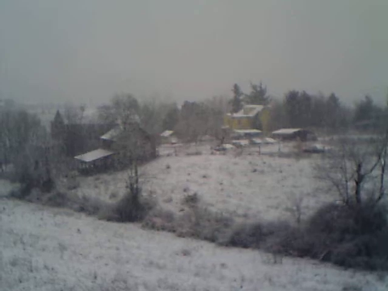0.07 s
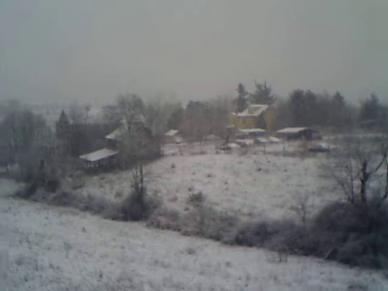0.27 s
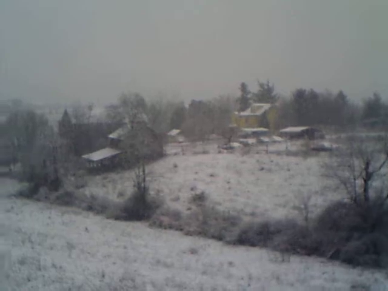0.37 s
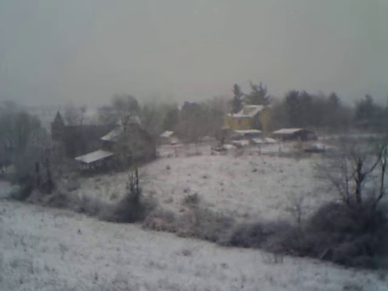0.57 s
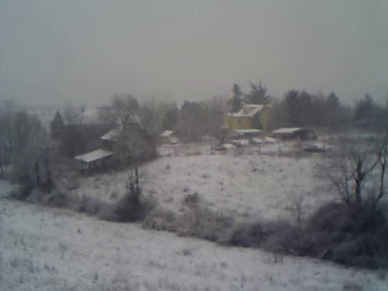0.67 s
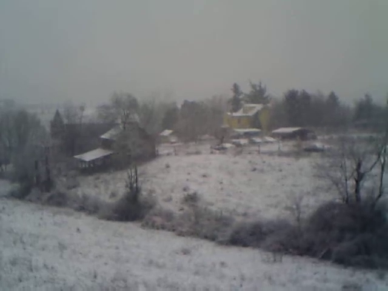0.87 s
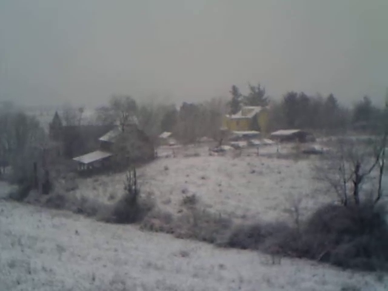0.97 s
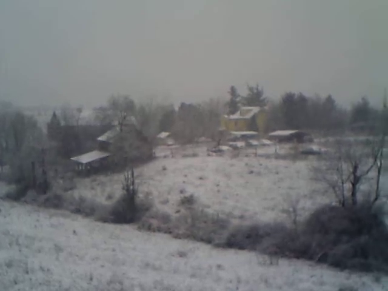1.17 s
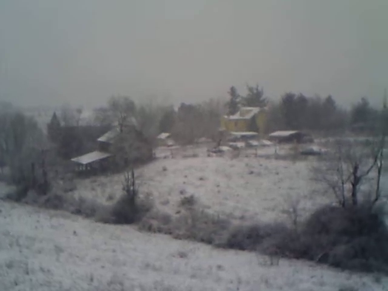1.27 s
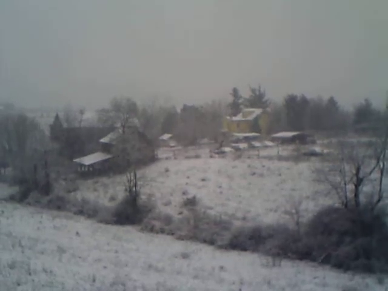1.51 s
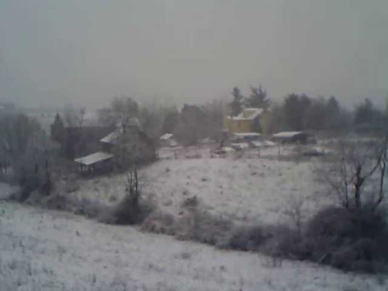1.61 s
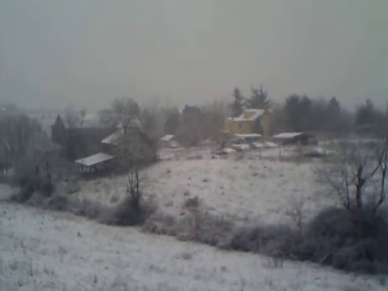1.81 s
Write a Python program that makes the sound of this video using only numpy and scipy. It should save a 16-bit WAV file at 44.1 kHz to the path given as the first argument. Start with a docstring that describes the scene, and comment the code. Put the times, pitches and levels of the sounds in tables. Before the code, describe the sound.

Light wind rumbles on the microphone in an open field, fading in as two loud, crackly electrical thumps hit close up. The wind and a distant wash then grow slightly, with faint hiss and tiny camera ticks.

```python
"""Camera starting up in a snowy field

The microphone input settles with a few electrical thumps: its voltage jumps, sags and
snaps back, twice hard enough to overload. Light wind on the microphone and a distant wash
fade up, while the camera adds faint hiss, a thin whine, fine clicks and lens motor ticks."""
import sys
import numpy as np
from scipy import signal
from scipy.fft import rfft, irfft
from scipy.io import wavfile
from scipy.ndimage import uniform_filter1d

SR = 44100
rng = np.random.default_rng(int(sys.argv[2]) if len(sys.argv) > 2 else 0)


def generate_wav(signal):
    """Clip the signal to [-1, 1] and save it as 16-bit WAV at the path in sys.argv[1]."""
    frames = np.transpose(np.atleast_2d(signal))
    scaled = np.clip(frames, -1, 1) * 32767
    pcm = np.round(scaled).astype(np.int16)
    wavfile.write(sys.argv[1], SR, pcm)


N = 81585
T = np.arange(N) / SR


def amp(db):
    """Decibels to gain."""
    return 10 ** (np.asarray(db) / 20)


def unit(x):
    """Scales to rms 1."""
    return x / np.sqrt(np.mean(x ** 2) + 1e-20)


def curve(points):
    """Automation: straight lines between (time, value) points."""
    return np.interp(T, *np.transpose(points))


def noise(spectrum, patchy_db=0):
    """Coloured noise at rms 1, with optional patches drifting in time and frequency."""
    hz, db = np.transpose(spectrum)
    bands = signal.stft(rng.standard_normal(N), nperseg=512)[2]
    patches = uniform_filter1d(rng.standard_normal(bands.shape), size=9, axis=0)
    patches = uniform_filter1d(patches, size=10, axis=1)
    white = signal.istft(bands * amp(patchy_db * unit(patches)), nperseg=512)[1][:N]
    log_hz = np.log(np.fft.rfftfreq(N, 1 / SR) + 1)
    colour = amp(np.interp(log_hz, np.log(hz), db))
    return unit(irfft(rfft(white) * colour, N))


def low_pass(x, hz, taps):
    """Steep linear-phase low-pass."""
    return signal.fftconvolve(x, signal.firwin(taps, hz, window=("kaiser", 8), fs=SR), "same")


# Dark tone of the crackle (frequency [Hz], level [dB])
CRACKLE_EQ = [(30, 0), (150, 4), (400, -7.5), (1200, -17), (3500, -32), (9000, -30.5), (12000, -37)]
# Thump cues (time [s], length [s], height [share of full scale], sag time [s], crackle level [dB])
THUMP_CUES = [(0.0727, 0.18, 0.0086, .045, -74), (0.0774, 0.17, 0.016, 0.037, -76),
              (0.2009, .023, 0.16, 0.0085, -34), (0.2241, .03483, 0.98, 0.0512, -19),
              (0.6302, 0.021, 0.91, 0.021, -23)]

def input_thumps():
    """Voltage steps that sag and cut off, with crackle riding on them."""
    crackle = noise(CRACKLE_EQ)
    thumps = np.zeros(N)
    for start, length, height, sag, crackle_db in THUMP_CUES:
        age = T - start
        gate = (age >= 0) & (age < length)
        envelope = gate * np.exp(-np.maximum(age, 0) / sag)
        thumps += envelope * (height + amp(crackle_db) * crackle)
    return thumps


# Nearly flat tone of the hiss (frequency [Hz], level [dB])
HISS_EQ = [(20, 2), (300, -3), (1500, 0.5), (4000, -1.5), (9000, 0.5), (12000, -11)]

def electronics(whine_hz=3330, wander_hz=4, start_s=0.075):
    """The input's own hiss and the camera's thin, fluttering whine switch on together."""
    wander, flutter = unit(uniform_filter1d(rng.standard_normal((2, N)), size=700))
    phase = 2 * np.pi * np.cumsum(whine_hz + wander_hz * wander) / SR
    whine = amp(-70.5) * unit((1 + 0.37 * flutter) * np.sin(phase))
    hiss = amp(-63) * noise(HISS_EQ)
    return (whine + hiss) * (T > start_s)


# Soft, broad tone of the wash (frequency [Hz], level [dB])
WASH_EQ = [(20, -2), (100, 1.5), (200, -2), (390, -7.5), (760, -6.5), (1260, -12), (1800, -16), (3500, -19),
           (6400, -19.5), (9600, -19.5), (12000, -31.5)]

def distant_wash():
    """The far-off background of the field: an even, faintly shifting noise."""
    return amp(-43.5) * noise(WASH_EQ, patchy_db=0.83)


# Bass-heavy tone of the wind (frequency [Hz], level [dB])
WIND_EQ = [(10, -22.5), (25, 5.5), (60, -2.5), (120, -6), (170, -15.5), (280, -23), (600, -29.5),
           (2000, -70)]
# Rise and fall of the gusts (time [s], level [dB])
GUSTS = [(.2, -14), (.3, -1.5), (.5, -8.5), (.6, -1), (.8, 0.5), (1.0, 1), (1.85, 1.5)]

def wind():
    """Light gusts on the microphone make a lumpy rumble."""
    return amp(-30.5 + curve(GUSTS)) * noise(WIND_EQ, patchy_db=2.5)


# Fader ride on the wash and wind (time [s], level [dB])
OUTDOOR_FADE = [(.05, -70), (.17, -44), (.195, -16), (.265, -7.5), (.63, -9.5), (.66, -10.5), (1.0, -7),
                (1.4, -2.5), (1.46, -1.5), (1.55, -1.5), (1.7, 1), (1.85, 4)]

def outdoors():
    """Wash and wind fade up together as the input settles."""
    return (distant_wash() + wind()) * amp(curve(OUTDOOR_FADE))


# The input's resting voltage (time [s], offset [share of full scale])
RESTING_VOLTAGE = [(.23, 0), (.259, 0.087), (.275, .19), (.315, 0.29), (.42, .21), (.58, .18), (.63, 0.12),
                   (.65, 0.015), (1.85, 0.019)]

def input_drift():
    """A slow voltage swell under the two big thumps, falling back with the second."""
    return curve(RESTING_VOLTAGE)


# Crisp ring of the clicks (frequency [Hz], level [dB])
CLICK_EQ = [(20, -50), (6000, -22), (8500, -3), (9500, 9), (11500, -13), (14000, -22)]
# Click cues (time [s], level [dB])
CLICK_CUES = [(.541, -43.5), (1.705, -40)]

def fine_clicks(decay_s=0.0023):
    """Tiny bursts of bright noise from the camera, with a hard attack and a quick decay."""
    envelope = sum(amp(db) * (T > at) * np.exp(-abs(T - at) / decay_s) for at, db in CLICK_CUES)
    return envelope * noise(CLICK_EQ)


# High, double-peaked ring of the ticks (frequency [Hz], level [dB])
TICK_EQ = [(20, -60), (5000, -31), (7200, -16), (8000, 3), (8700, -12), (9500, -1), (10500, -23),
           (13000, -40)]
# Tick cues, growing louder (time [s], level [dB])
TICK_CUES = [(.785, -58), (.868, -59), (.993, -58), (1.125, -57), (1.2, -54), (1.325, -52.5), (1.45, -51),
             (1.573, -47.5), (1.658, -47), (1.777, -48)]

def lens_motor(width_s=0.006):
    """The motor ticks in soft-edged pulses of high, rasping noise."""
    envelope = sum(amp(db) * np.exp(-((T - at) / width_s) ** 2) for at, db in TICK_CUES)
    return envelope * noise(TICK_EQ)


def scene():
    """The mono mix of everything that reaches the input."""
    return (input_thumps() + electronics() + outdoors() + input_drift() + fine_clicks() + lens_motor())[None]


def record(dry):
    """The preamplifier overloads, loses its top end and hits the rail; a last low-pass trims the edge."""
    headroom, rail = 0.78, 0.707  # shares of full scale
    overloaded = np.clip(dry[0], -headroom, headroom)
    narrowed = low_pass(overloaded, hz=11480, taps=111)
    railed = np.clip(narrowed, -rail, rail)
    return low_pass(railed, hz=16600, taps=127)[None]


dry = scene()
out = record(dry)
generate_wav(out)
```